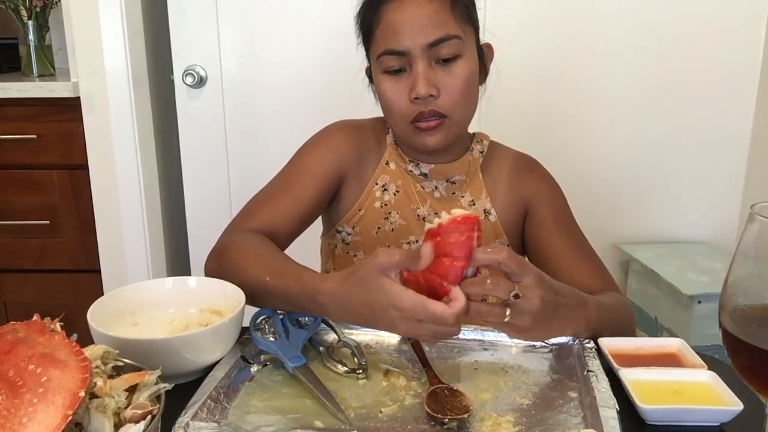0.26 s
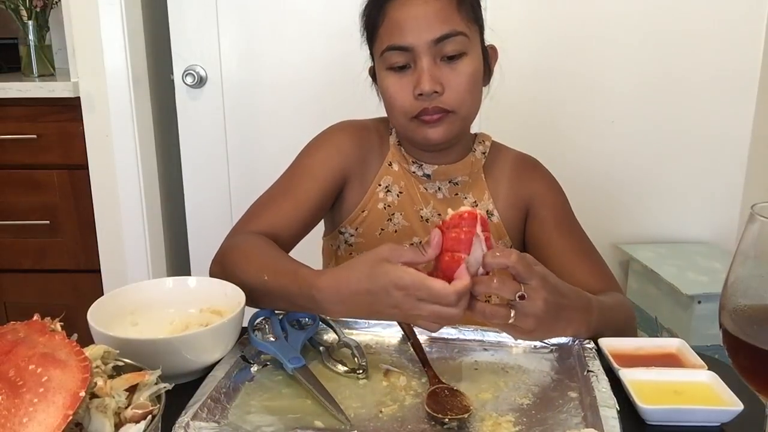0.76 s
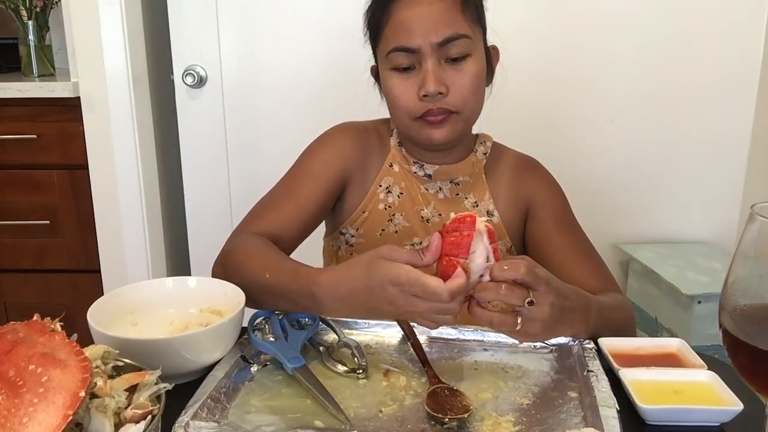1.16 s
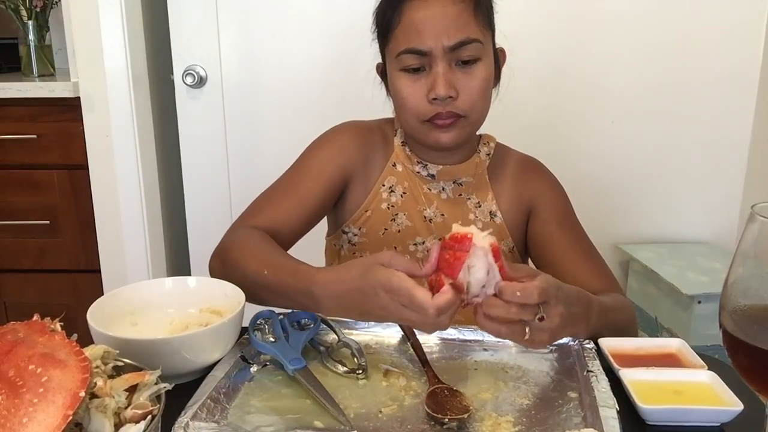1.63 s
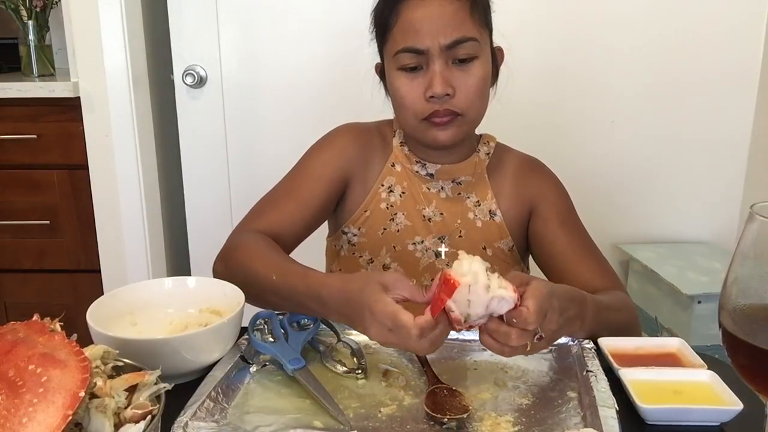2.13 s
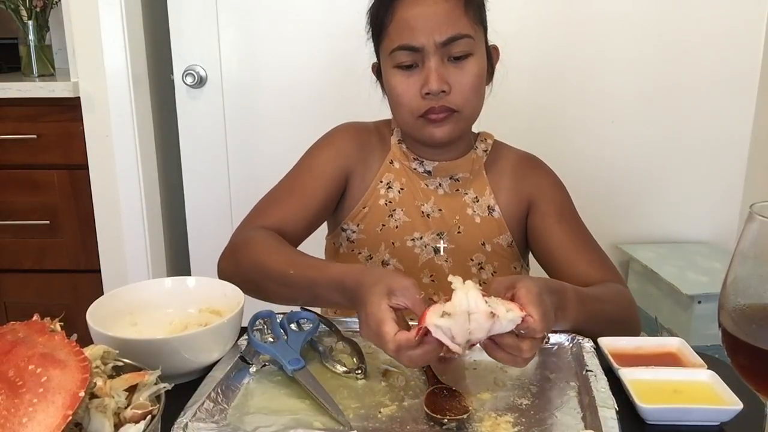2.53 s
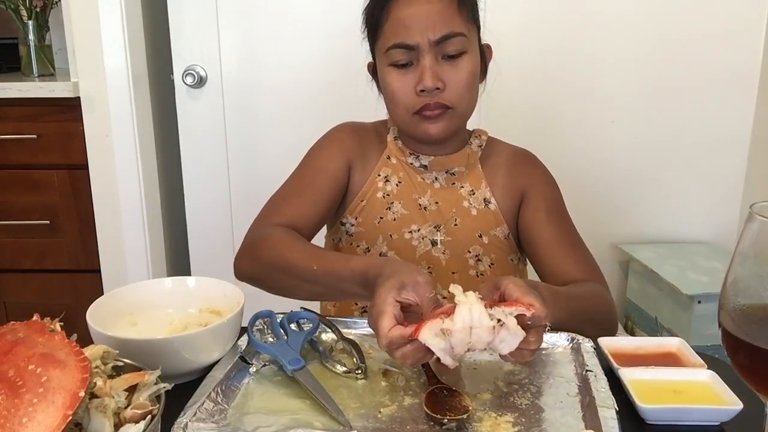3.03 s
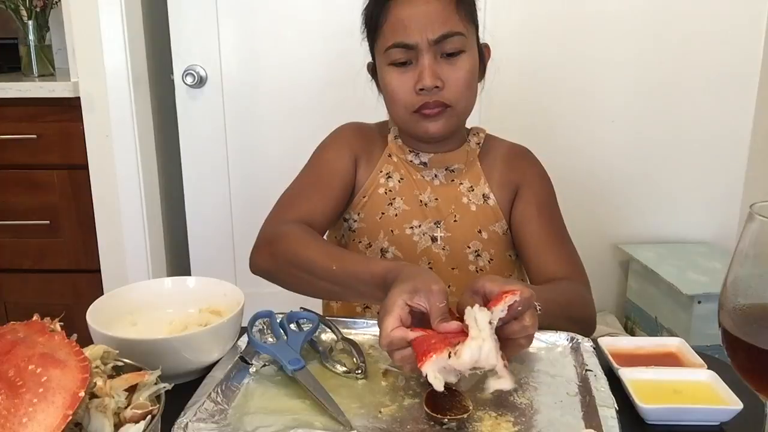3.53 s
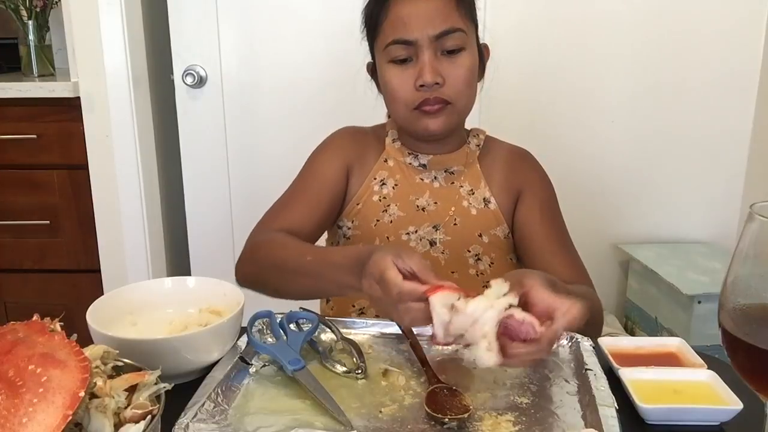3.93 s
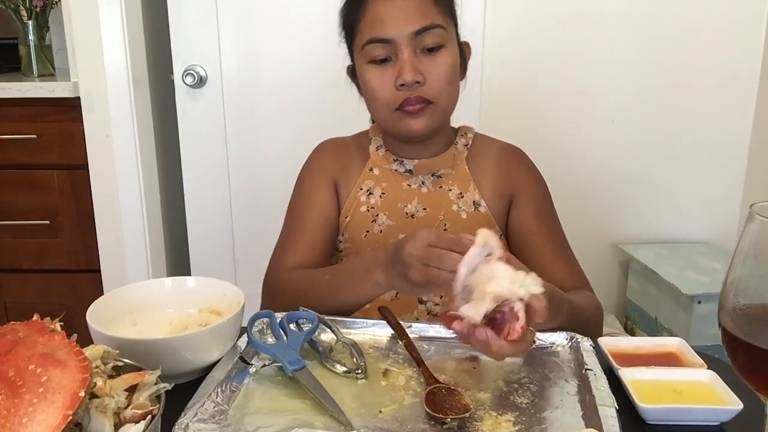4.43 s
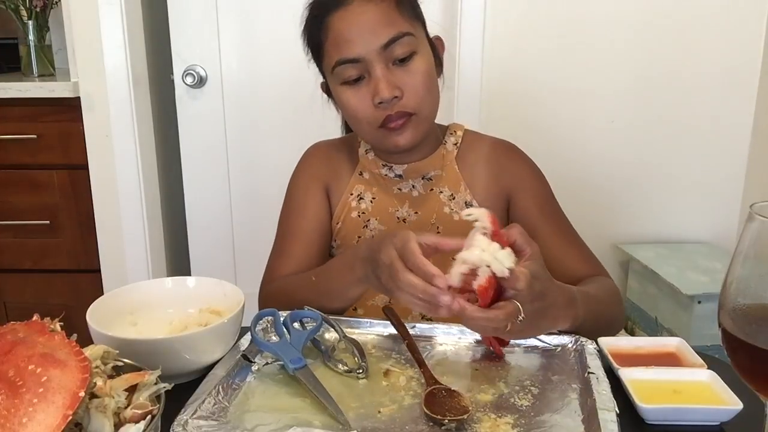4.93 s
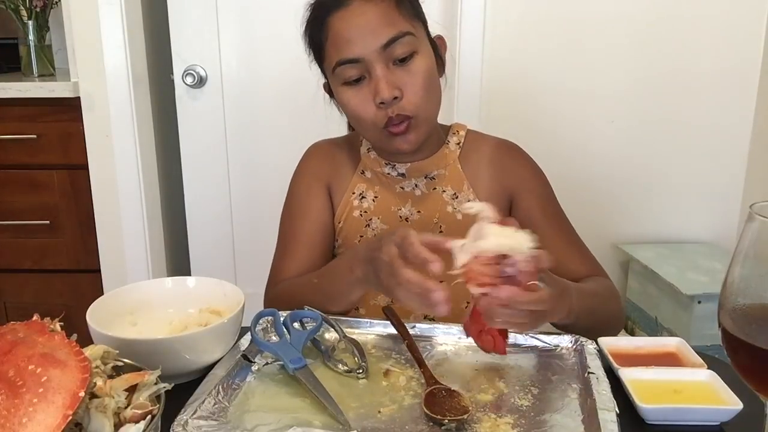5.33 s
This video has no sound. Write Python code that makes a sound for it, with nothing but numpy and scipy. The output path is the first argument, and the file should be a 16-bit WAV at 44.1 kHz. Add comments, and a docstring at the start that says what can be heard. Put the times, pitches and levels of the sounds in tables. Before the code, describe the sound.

A lobster shell cracks crisply in uneven clusters in a bare, reflective kitchen, densest around two seconds, then fades into soft hum and hiss.

```python
"""An appliance hums and a faint hiss lies under it in a bare kitchen, while hands pry a hard lobster shell apart.
The first crack falls just before the start, so only its echo is heard; then something bumps the table once.
Sharp cracks follow, thickest in the middle, then faint ones: each is a snap of noise, two short rings and a knock.
Tray, near walls and room answer each crack. The house rumble sinks for a while and returns.
Throughout, the camera's noise suppressor cuts the tails short, and its colour and band limit shape the sound."""
import sys
import numpy as np
from scipy import signal
from scipy.fft import rfft, irfft, next_fast_len
from scipy.io import wavfile
from scipy.ndimage import uniform_filter1d, map_coordinates

SR = 44100
rng = np.random.default_rng(int(sys.argv[2]) if len(sys.argv) > 2 else 0)


def int16_out(signal):
    """Quantize to a 16-bit WAV file."""
    q = np.round(np.clip(np.atleast_2d(signal).T, -1, 1) * 32767)
    wavfile.write(sys.argv[1], SR, q.astype(np.int16))


N = 245637


def amp(db):
    """Turn a level in dB into a gain."""
    return 10 ** (np.asarray(db) / 20)


def unit(x):
    """Scale x to an rms of 1."""
    return x / np.sqrt(np.mean(x ** 2) + 1e-20)


def along(points, hz):
    """Read a curve of (frequency [Hz], value) points on a log frequency axis."""
    f, v = np.transpose(points)
    return np.interp(np.log(hz + 1), np.log(f + 1), v)


def filtered(x, response):
    """Multiply the spectrum of x by a gain that depends on frequency."""
    size = next_fast_len(x.shape[-1] + 4096)
    hz = np.fft.rfftfreq(size, 1 / SR)
    return irfft(rfft(x, size) * response(hz), size)[..., :x.shape[-1]]


def noise(response):
    """Make coloured noise of rms 1, as long as the scene."""
    return unit(filtered(rng.standard_normal(N), response))


def wobble(rate, size):
    """Draw a smooth random curve of size samples through rate random points a second."""
    knots = rng.standard_normal(int(size * rate / SR) + 4)
    return map_coordinates(knots, [np.arange(size) * rate / SR])


def room_noise():
    """A faint steady hiss of filtered noise, whose bass wavers in level."""
    # colour of the room noise, only its shape counts: (frequency [Hz], level [dB per Hz])
    air_colour = [(20, -44), (35, -19.5), (48, -11), (80, -20.5), (100, -13), (120, -6.5), (180, -5.5),
                  (240, -7.5), (330, -7.5), (450, -16.5), (1000, -22.5), (4000, -29), (7000, -33.5),
                  (14000, -45.5)]
    air = amp(-66.5) * noise(lambda hz: amp(along(air_colour, hz)))
    bass = filtered(air, lambda hz: 1 / (1 + (hz / 400) ** 4))
    return air - bass + bass * amp(2.2 * wobble(6, N))


def appliance_hum():
    """Appliance motors give steady tones; close neighbours beat as they drift in and out of step."""
    # tones of the motors: (frequency [Hz])
    motor_hz = [59.3, 118.61, 119.89, 154.7, 164, 215.3, 237.17, 239.79, 287.7, 309.4]
    # middle rms level of each tone, about which it wavers: (level [dB])
    motor_db = [-79.5, -75, -71.5, -81, -72.5, -75.5, -69, -72, -82, -77]
    in_step_s = 0.385  # moment at which all the tones peak together
    t = np.arange(N) / SR
    hum = np.zeros(N)
    for hz, db in zip(motor_hz, motor_db):
        level = np.sqrt(2) * amp(db + 2.1 * wobble(5, N))
        hum += level * np.cos(2 * np.pi * hz * (t - in_step_s))
    return hum


def rumble_and_bump():
    """Low noise rumbles through the house and swells when the table is bumped, then dies away."""
    # colour of rumble and bump, only its shape counts: (frequency [Hz], level [dB per Hz])
    thump_colour = [(25, -11), (42, 3.5), (90, -0.5), (140, 3.5), (200, -17.5), (400, -62.5)]
    # house rumble, about which it wavers: (time [s], level [dB])
    rumble_levels = [(0, -70.5), (1.3, -72), (1.8, -81), (3.3, -79), (3.6, -71.5), (5.57, -71.5)]
    bump_s, bump_db, rise_s, t60_s = 0.546, -52, 0.07, 0.56  # peak time and level, rise, decay by 60 dB
    t = np.arange(N) / SR
    rising = np.exp(-((t - bump_s) / rise_s) ** 2)
    dying = amp(-60 * (t - bump_s) / t60_s)
    bump = amp(bump_db) * np.where(t < bump_s, rising, dying)
    house = amp(np.interp(t, *np.transpose(rumble_levels)) + 3 * wobble(1.9, N))
    return (bump + house) * noise(lambda hz: amp(along(thump_colour, hz)))


def background():
    """Hum, rumble and room noise add up to the quiet floor under the cracks."""
    return appliance_hum() + rumble_and_bump() + room_noise()


def walls():
    """Early copies from tray and near walls, each smeared a little by uneven surfaces."""
    # tray and near walls, levels relative to each other: (delay [s], level [dB])
    echoes = [(.0019, -11), (.0035, -17), (.0052, -19), (.0076, -15), (.0086, -14), (.0099, -14),
              (.0113, -16), (.0125, -17)]
    answer = np.zeros(SR // 50)
    smear_size = SR // 700
    smear = rng.standard_normal((len(echoes), smear_size)) * amp(-np.linspace(0, 14, smear_size))
    for (delay_s, db), shape in zip(echoes, smear):
        start = round(delay_s * SR)
        answer[start:][:smear_size] += amp(db + 6.5) * shape / np.linalg.norm(shape)
    return answer


def kitchen(sides):
    """The room's tail takes the mean colour of all sides; each frequency dies at its own speed."""
    # how long the room rings: (frequency [Hz], time to fall 60 dB [s])
    room_t60 = [(500, 0.37), (1500, 0.55), (4000, 0.65), (8000, 0.59), (15000, 0.33)]
    # colour of the reverberation, relative: (frequency [Hz], level [dB])
    room_colour = [(500, -2), (1500, 3), (4000, -0.5), (8000, -1.5), (11000, -0.5), (15000, -3)]
    hz, t, z = signal.stft(rng.standard_normal(SR * 3 // 5), SR, nperseg=512)
    z = z * amp(along(room_colour, hz)[:, None] - 60 * t / along(room_t60, hz)[:, None])
    crack_colour = np.sqrt(np.mean(np.abs(rfft(sides, 2048)[:, ::4]) ** 2, axis=0))
    plain, tail = signal.istft(np.array([z, z * crack_colour[:, None]]), SR, nperseg=512)[1]
    t = np.arange(len(tail)) / SR
    # single echoes stand out while the tail is young
    tail = tail * amp(2.0 * np.exp(-t / 0.1) * wobble(350, len(t)))
    build_up = 1 - np.exp(-(t / 0.014) ** 2)
    return amp(2.5) * tail / np.linalg.norm(plain) * build_up


def without_bass(x, hz):
    """A thin shell radiates no bass, so cut what lies below hz."""
    return signal.sosfilt(signal.butter(3, hz, "high", fs=SR, output="sos"), x)


def crack(ring_ms, low_hz, high_hz, high_db, snap_db, knock_db, count=8):
    """A brittle snap of noise, two rough rings and a dull knock, as sent in count directions."""
    # colour of the break itself, only its shape counts: (frequency [Hz], level [dB])
    snap_colour = [(300, -37.5), (900, -12), (2500, 6), (8000, 2), (16000, -6.5)]
    hollow_hz = 863  # knock of the shell's hollow
    t = np.arange(SR // 40) / SR
    rise = 1 - np.exp(-t / 0.00015)

    # the sides ring a little apart: spread of low ring, high ring and knock; side 0 stays in tune
    spread = np.reshape([.025, .06, .05], (3, 1, 1))
    other_side = np.arange(count)[:, None] > 0
    detune = 1 + spread * rng.standard_normal((3, count, 1)) * other_side

    # two patches of shell ring, the high one dying sooner
    rough = 1 + 0.8 * uniform_filter1d(rng.standard_normal((2, count, len(t))), size=5)
    low = np.sin(2 * np.pi * low_hz * detune[0] * t) * amp(-60 * 1000 * t / ring_ms)
    high = np.sin(2 * np.pi * high_hz * detune[1] * t) * amp(-60 * 1000 * t / (0.79 * ring_ms))
    high = amp(high_db) * high
    rings = rise * (rough[0] * low + rough[1] * high) / amp(max(high_db, 0))

    white = rng.standard_normal((count, len(t)))
    grit = unit(filtered(white, lambda hz: amp(along(snap_colour, hz))))
    snap = amp(snap_db + 9) * rise * amp(-60 * t / 0.0052) * grit
    knock = amp(knock_db) * np.sin(2 * np.pi * hollow_hz * detune[2] * t) * amp(-60 * t / 0.014)

    sides = without_bass(rings + snap, hz=770) + without_bass(knock, hz=380)
    # every side equally loud, peak near 1
    energy = np.linalg.norm(sides, axis=1, keepdims=True)
    return sides / energy * np.mean(energy) / np.mean(np.abs(sides).max(axis=1))


def shell():
    """Each break of the shell sounds directly, then comes back from near walls and room."""
    # the cracks, levels before the fixed offsets added below and in crack(): (time [s], peak [dB],
    # low ring's time to fall 60 dB [ms], low ring [Hz], high ring [Hz],
    # high ring against low [dB], snap [dB], room share [dB])
    cracks = [(-0.09, -17.5, 2.9, 2150, 4940, -0.5, -13, -1), (0.5472, -56.5, 4.7, 3340, 6870, -10, -28, 1),
              (0.56, -62, 7, 4000, 6590, -13, -23, -12), (0.58, -54, 6.3, 2810, 6010, -24, -34, -10),
              (0.8077, -58, 3.2, 2670, 6630, -15, -34, 2.5), (0.8516, -50, 7, 2280, 12100, -47, -46, 6.5),
              (0.8637, -38.5, 5.7, 2840, 5060, -17, -32, -17),
              (0.869, -29, 6.4, 2280, 11560, -16.5, -40, -6.5),
              (1.0632, -17, 3.8, 4360, 7260, 1, -12, -1.5), (1.0896, -29, 7.3, 1620, 2880, -24, -30, -9),
              (1.0979, -29, 12, 1490, 6340, 0, -19, 2), (1.333, -44.5, 6.5, 4540, 5470, -2.5, -17.5, -1.5),
              (1.561, -54, 3.5, 1780, 3000, -1, -31, -2), (1.5712, -52.5, 5.5, 1550, 7340, -28.5, -31, 0),
              (1.6066, -42, 4.7, 1140, 3900, -5, -25, 1.5), (1.615, -43.5, 7.5, 1640, 6010, -26.5, -46, -6),
              (1.723, -31, 7, 3100, 6000, -14.5, -11.5, 0), (1.7387, -19, 4.3, 2700, 8600, 9, -11.5, 2),
              (1.7452, -30, 6, 2500, 5950, 2.5, -14.5, -9), (1.7492, -15, 5.9, 3520, 6300, 1, -8.5, -11),
              (1.759, -22, 3.4, 1639, 9220, -3, -25, -5.5), (1.7616, -27, 8, 4160, 6030, -1.5, -14, -4),
              (1.7835, -19.5, 7.7, 4590, 5360, 4.5, -4.5, -5.5),
              (1.91, -17.5, 4.9, 4300, 8200, -13.5, -11, -5.5),
              (1.921, -17.5, 2.7, 2660, 5640, -22, -34, -6.5),
              (1.9314, -18.5, 7.3, 3000, 8740, -24.5, -38, -11),
              (1.9486, -16.5, 4.5, 3740, 6270, -22, -4, -3.5),
              (1.9499, -15.5, 6.8, 3484, 6550, -26, -28, -17.5),
              (1.9548, -26, 9.4, 1870, 6650, 4.5, -8, -2), (2.081, -20, 2.2, 1700, 6250, -3, -28, -5),
              (2.0887, -20.5, 2.1, 3230, 5660, -8, -39, -9),
              (2.092, -25.5, 6.3, 1930, 5650, 2.5, -23.5, -3.5),
              (2.2129, -24.5, 5, 3120, 5140, 4, -9.5, -3.5), (2.3003, -26, 6.6, 4540, 10840, 2.5, -7, -3.5),
              (2.389, -41, 8.9, 4590, 5400, 5.5, -16, 0.5), (2.4169, -47, 7, 4100, 5150, -9.5, -14.5, 2),
              (2.452, -15.5, 4.1, 3130, 5180, 10, -17.5, -6), (2.4539, -16, 8.3, 2760, 5820, -8, -8, -6),
              (2.4605, -17, 15, 2480, 5060, -5, -9.5, -8.5),
              (2.5424, -24.5, 4.6, 1760, 3600, -2.5, -12, -5),
              (2.5933, -30, 3.9, 2460, 6700, -8, -13.5, -4.5), (2.788, -48.5, 4.4, 1810, 7400, 9, -14.5, 1),
              (2.8102, -54, 5, 1710, 7400, -4, -18, 1), (2.8293, -13, 6, 3340, 6870, 6.5, -9.5, -6),
              (2.9531, -17, 9.2, 3900, 7730, 5.5, -7, -4.5),
              (3.2178, -48.5, 4.5, 4140, 5370, -8.5, -17.5, -3.5),
              (3.233, -26, 14, 3900, 5500, 0, -15, -5.5),
              (3.236, -16, 5.7, 3720, 5400, -10.5, -18.5, -11.5),
              (3.2389, -28.5, 5, 2400, 5400, -9, -9.5, 6), (3.2656, -29, 5.7, 1000, 5000, -1, -15, -9),
              (3.275, -22, 5.3, 3730, 5560, -9, -37, -9.5), (3.2821, -24, 7.3, 4290, 5060, 2.5, -9, -1),
              (3.3949, -36.5, 4, 3550, 4800, -5, -19, 0), (3.425, -46.5, 6, 3500, 8000, 5, 0, -16),
              (3.5368, -53, 6.7, 4260, 5140, 8, -30, 2), (3.5481, -45.5, 5.6, 3680, 6360, 2, -8, 1),
              (3.6084, -31, 4.8, 2430, 6940, 0, -8, -4.5), (3.6885, -42.5, 6, 3400, 5160, -4, -14, -1),
              (3.6996, -50, 5.4, 3570, 5400, 5.5, -26, -8), (3.711, -34, 5.9, 3500, 5260, -3, -21, -1.5),
              (3.721, -44, 6, 3680, 5200, 27, -23, 10), (3.7311, -22.5, 9.4, 3400, 5400, -9, 3, -6),
              (3.7451, -28, 6, 3530, 6700, 14, -3.5, -11.5),
              (3.945, -44.5, 14, 4260, 5360, -17, -23.5, -11),
              (3.9488, -43.5, 12, 832, 3120, -2.5, -19.5, -9.5),
              (4.0123, -61.5, 4.2, 4150, 5490, -10, -26.5, 0), (4.1433, -53, 4, 980, 6110, -24, -38, -5),
              (4.2566, -54, 5, 1990, 12400, -22, -21.5, -13.5),
              (4.2648, -54.5, 6, 3040, 7810, -14, -28, -8), (4.499, -54.5, 4.4, 6200, 8800, 5.5, -6, -11),
              (4.5293, -58, 3.3, 4520, 5980, 0, -21, -5), (4.5393, -60, 3, 4180, 6140, 0, -23, -7.5),
              (5.1859, -51, 5.3, 2910, 7040, -13, -29, -3.5),
              (5.2607, -46, 12, 4070, 10840, -11.5, -30, -8), (5.3992, -60, 5.8, 2900, 6520, -7, -13, -19)]
    lead = SR // 4  # room for the crack that falls before the start
    out = np.zeros(lead + N + SR)
    for time_s, db, *voice, room_db in cracks:
        # harder breaks carry less knock
        knock_db = -24 - 0.23 * (db + 25)
        sides = crack(*voice, knock_db)
        # the faintest cracks start louder, as the suppressor holds them down
        faint_lift_db = 0.61 * max(-47 - db, 0)
        sides = amp(db - 4.5 + faint_lift_db) * sides
        near = amp(room_db) * np.convolve(sides[1], walls())
        tail = amp(room_db) * kitchen(sides)
        start = lead + round(time_s * SR)
        for part in (sides[0], near, tail):
            out[start:][:len(part)] += part
    return out[lead:lead + N]


def suppressed(x):
    """The camera's suppressor holds down what lies near the steady floor, so tails end in a step."""
    depth_db, opens_db, range_db, from_hz = 6.5, 4, 8, 700  # depth, start above floor, range, soft low edge
    hz, _, z = signal.stft(x, SR, nperseg=512, noverlap=384)
    # smooth the power over frequency, then over time
    power = uniform_filter1d(np.abs(z) ** 2, size=11, axis=1)
    power = uniform_filter1d(power, size=7, axis=2)
    level_db = 10 * np.log10(np.abs(power) + 1e-20)
    over_db = level_db - np.percentile(level_db, 20, axis=2, keepdims=True)
    opened = np.clip((over_db - opens_db) / range_db, 0, 1)
    opened = opened / (1 + (from_hz / (hz[:, None] + 1)) ** 2)
    # the floor keeps gain 1 and louder sound is lifted above it
    return signal.istft(z * amp(depth_db * opened), SR, nperseg=512, noverlap=384)[1][:, :N]


def scene():
    """The shell's cracks over the background, in one channel."""
    return (shell() + background())[None]


def record(dry):
    """The camera suppresses noise, colours the sound and cuts off the highest treble."""
    # colour of the camera: (frequency [Hz], level [dB])
    camera_colour = [(3800, -2.5), (4900, -3), (5700, 0), (9500, 0), (10400, -4), (11600, 1.5), (15600, 4),
                     (15950, -19.5), (16900, -28)]
    top_hz = 16950
    return filtered(suppressed(dry), lambda hz: amp(along(camera_colour, hz)) * (hz < top_hz))


dry = scene()
out = record(dry)
int16_out(out)
```